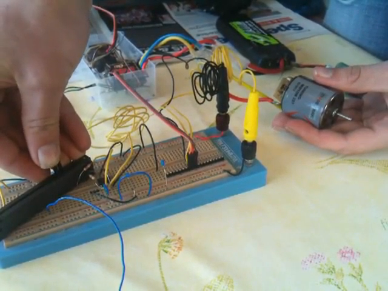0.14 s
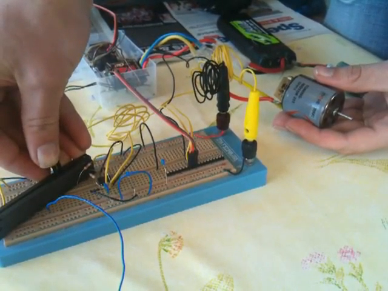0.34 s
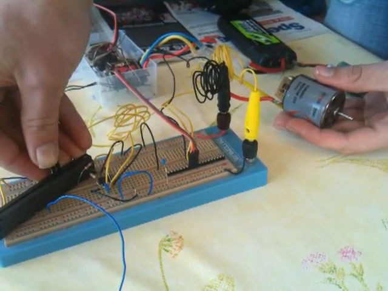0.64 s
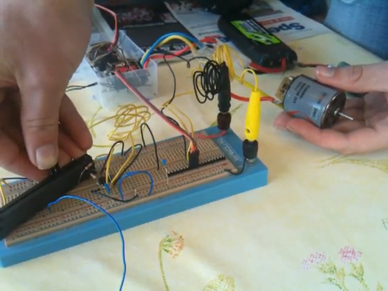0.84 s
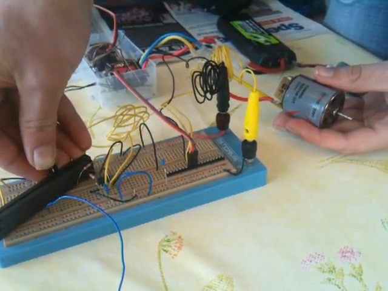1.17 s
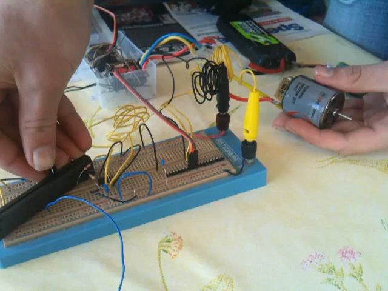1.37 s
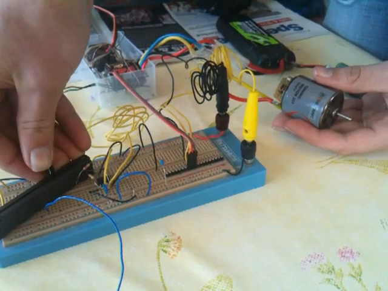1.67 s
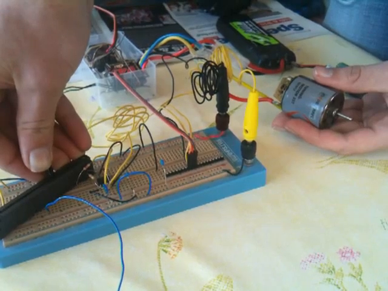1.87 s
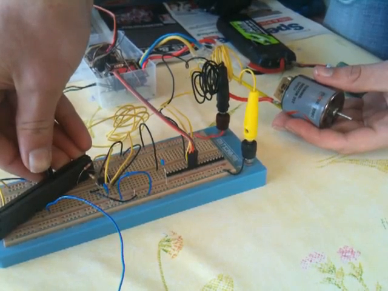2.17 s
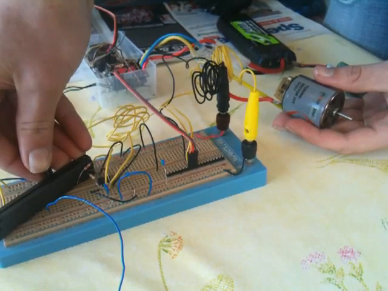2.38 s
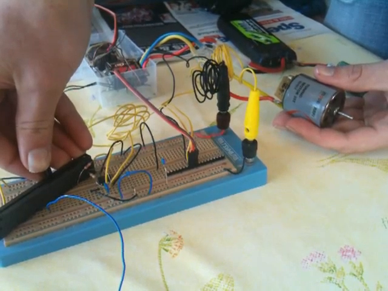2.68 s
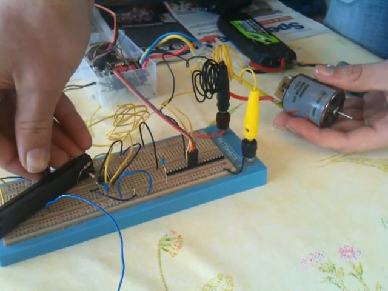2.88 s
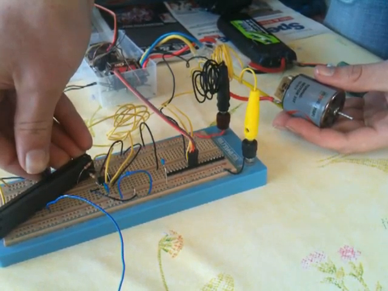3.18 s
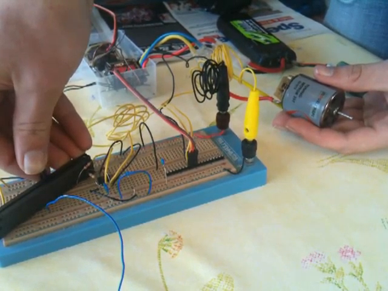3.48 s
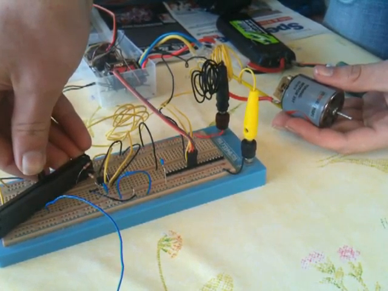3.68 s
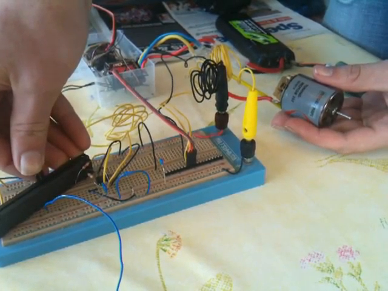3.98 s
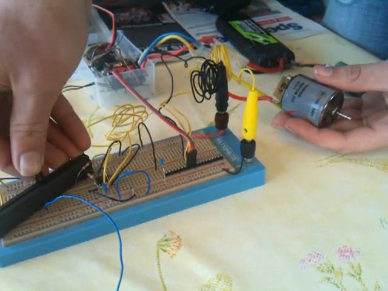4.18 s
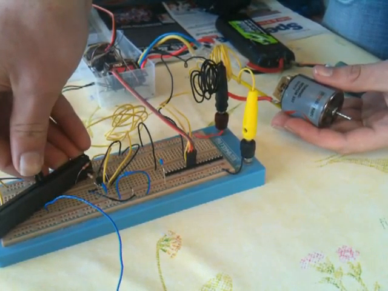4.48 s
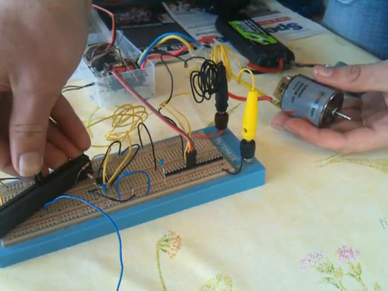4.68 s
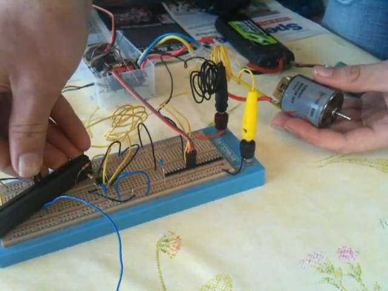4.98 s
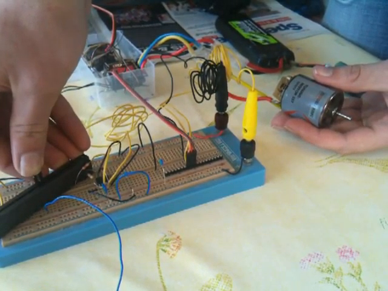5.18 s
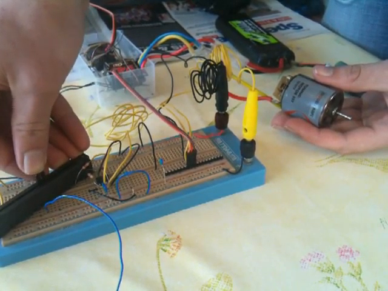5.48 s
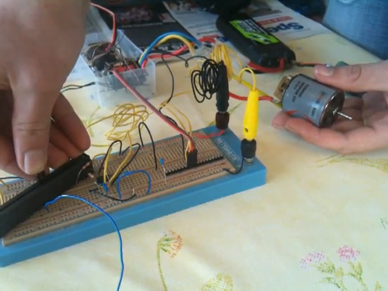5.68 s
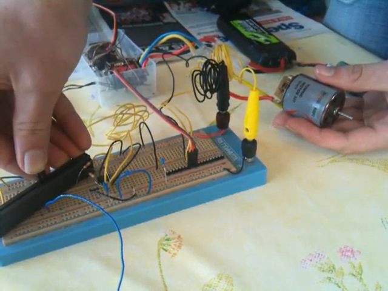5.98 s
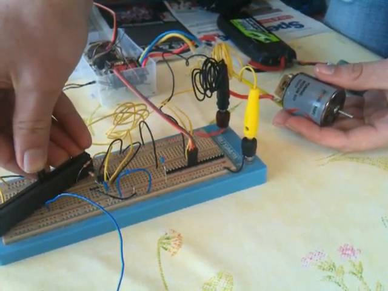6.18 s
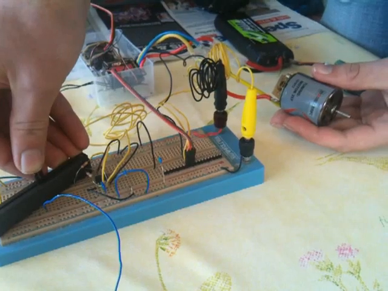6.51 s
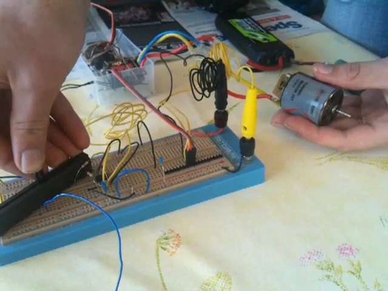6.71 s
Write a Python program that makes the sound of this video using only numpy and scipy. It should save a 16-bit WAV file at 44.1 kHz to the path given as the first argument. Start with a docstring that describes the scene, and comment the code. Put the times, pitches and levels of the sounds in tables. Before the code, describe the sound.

Close, dry indoor sound of a little electric motor: steady high whir and metallic brush hiss at first, slowly sagging in pitch. Dull knocks on the bench, a sudden drop in harshness, then a faster wind-down with a wavering electronic whine and small rasps until it stalls. Quiet room murmur follows, then a pulsing whine with irregular dry scratches as it turns slowly, plus one soft late bump.

```python
"""In a quiet room a small three-pole brushed motor, held in a hand over a table, runs from a chopped supply.
A knob turned by hand takes it from full speed down to a stall, then restarts it at a crawl.
Brush friction and arcing are noise pulsed by the passing segments and coloured by the steel can; rotor tones
follow the shaft speed; the windings sing at multiples of the chopping rate. Caught brushes scrape, segments tick,
and the hands bump the bench, whose modes ring."""
import sys
import numpy as np
from scipy import signal
from scipy.fft import rfft, irfft, next_fast_len
from scipy.io import wavfile

SR = 44100
rng = np.random.default_rng(int(sys.argv[2]) if len(sys.argv) > 2 else 0)


def persist_wave(psi):
    """Save psi, clipped to +-1, as 16-bit WAV."""
    counts = np.round(np.clip(psi, -1, 1) * 32767).astype(np.int16)
    wavfile.write(sys.argv[1], SR, np.atleast_2d(counts).T)


N = 302085
TIME, BINS = np.arange(N) / SR, np.arange(N // 2 + 1) * SR / N  # [s], [Hz]

# room background, relative spectrum: (frequency [Hz], level [dB])
ROOM_SPECTRUM = [(15, -77), (25, -52), (98, -17.5), (128, -8.5), (164, -10.5), (193, -3.5), (268, -5.5),
                 (451, -13), (489, -5), (531, -10.5), (757, -11), (2380, -20.5), (2800, -18.5),
                 (11300, -23), (17000, -29)]
# faint, slowly wavering room tones, middle levels: (frequency [Hz], level [dB])
ROOM_HUMS = [(274.5, -83), (489.9, -84), (7483, -95)]
# soft bumps on the bench: (time [s], strength [dB], pitch of the contact [Hz])
BENCH_BUMPS = [(1.598, -50.5, 140), (1.750, -49, 428), (1.760, -52, 330), (1.771, -43.5, 216),
               (1.782, -46, 258), (1.783, -55, 457), (1.790, -54.5, 614), (1.811, -58, 480),
               (1.829, -62, 250), (6.501, -50, 196)]
# modes of the bench: (frequency [Hz], relative level [dB], decay by 60 dB [s])
BENCH_MODES = [(151, -2, 0.05), (220, -11, 0.07), (261, -7, 0.18), (350, -4, 0.096), (424, 2, 0.13),
               (496, 5.5, 0.046), (635, 4, 0.052)]
# share of each chopping period for which the supply is on: (time [s], duty [0-1])
SUPPLY_DUTY = [(.5, 1), (1.6, 0.88), (3.2, 0.64), (3.45, 0.23), (4.16, 0.08), (4.19, 0.02), (4.72, .01),
               (4.74, 0), (5.47, 0), (5.55, 0.03), (5.6, 0.06), (5.65, 0.18), (5.8, 0.14)]
# shaft speed while the knob is turned down: (time [s], speed [turns/s])
SPEED_WIND_DOWN = [(0.0, 255.1), (0.37, 254.9), (0.44, 249.3), (0.53, 239.0), (0.62, 234.2), (0.82, 231.7),
                   (1.0, 225.9), (1.18, 220.8), (1.33, 220.5), (1.5, 217.2), (1.7, 209.8), (1.85, 203.0),
                   (1.94, 199.0), (2.0, 190.2), (2.1, 186.2), (2.27, 177.7), (2.58, 169.8), (2.78, 160.5),
                   (3.05, 143.2), (3.28, 125.2), (3.42, 110.4), (3.6, 96.4)]
# even braking to a stop: (time [s], speed [turns/s])
SPEED_BRAKING = [(3.6, 96.5), (4.21, 0)]
# uneven crawl after the restart: (time [s], speed [turns/s])
SPEED_CRAWL = [(5.64, 0), (5.72, 9.5), (5.9, 15.94), (6.08, 14.55), (6.23, 16.7), (6.44, 13.4),
               (6.58, 15.84), (6.85, 12.46)]
# song of the windings, before duty and shell:
# (multiple of chopping rate [-], steady level [dB], level of the part swinging with the poles [dB])
WINDING_OVERTONES = [(1, -63.5, -52.5), (2, -69, -58), (3, -63.5, -70), (4, -74.5, -68), (5, -60.5, -62.5),
                     (6, -100, -85), (8, -67, -83)]
# path of coil vibration to the air: (frequency [Hz], gain [dB])
COIL_PATH = [(300, -22), (660, -16), (800, -23), (1000, -17), (1230, -6), (1600, -12), (2100, -17),
             (2400, -12.5), (2700, -12), (3000, -14), (3750, -13), (4500, 3), (5200, -2.5), (5650, -15),
             (6750, 5.5), (8700, 1), (10500, -35)]
# a brush catches, at a crawl about once a turn: (time [s], relative peak level [dB])
BRUSH_CATCHES = [(3.1023, -45), (3.477, -37), (3.535, -42), (3.8203, -46), (3.889, -41.5), (4.033, -48),
                 (4.122, -42.5), (4.1607, -50), (5.753, -56), (5.882, -43.5), (5.9457, -46), (6.011, -44),
                 (6.1442, -42), (6.2065, -42), (6.2298, -43.5), (6.2684, -46), (6.3325, -43.5), (6.4, -46),
                 (6.474, -41), (6.544, -49), (6.607, -46), (6.673, -47), (6.7435, -43), (6.8193, -35)]
# colour of a brush's scrape, relative: (frequency [Hz], level [dB])
SCRAPE_COLOUR = [(100, -50), (500, -23), (2400, -19), (3300, -11), (4700, -16), (6100, -5.5), (6800, 3.5),
                 (7700, -10), (10000, -9), (12200, -15.5), (13100, 4.5), (14200, -24), (16500, -40)]
# tones of the rotor, before bearings: (multiple of shaft speed [-], level at full speed [dB],
# fall per halving of the speed [dB], lift under heavy current [dB])
ROTOR_ORDERS = [(2, -57.5, 49.5, 0.5), (3, -68.0, -10.5, 9.5), (5, -61.0, 22.0, -2.5), (6, -68.5, 4.0, 7.0),
                (8, -53.0, 28.0, -7.5), (9, -48.5, 15.5, 3.0), (12, -56.5, 10.0, -2.5),
                (15, -55.0, 23.5, -7.0), (18, -74.5, 7.0, 4.0), (21, -62.0, 19.0, -12.5),
                (24, -66.5, 10.5, -5.5), (27, -77.5, -2.5, 1.0), (30, -69.0, 10.5, -0.5),
                (33, -77.5, 9.5, 5.0), (36, -81.0, -4.0, 1.0), (39, -71.0, 18.5, -5.5),
                (42, -81.0, 0.0, 4.5), (45, -76.0, 10.5, -0.5), (48, -79.0, 4.0, -0.0),
                (51, -72.0, 13.0, -5.0), (54, -80.0, 4.5, 1.0), (57, -83.0, 4.0, -6.0),
                (60, -88.5, -2.5, -0.5), (63, -74.5, 12.5, -14.5)]
# path of rotor vibration through the bearings to the air: (frequency [Hz], gain [dB])
BEARING_PATH = [(250, -39), (500, -12.5), (700, -5.5), (900, -10), (1100, -21), (1700, -20), (2700, -17),
                (3400, -10), (4200, 3), (5600, 5.5), (6300, 1.5), (8500, 9.5), (10000, 12), (14500, 5),
                (15200, -20)]
# resonances of bearings and end plates: (frequency [Hz], width [Hz], lift [dB])
END_PLATE_RESONANCES = [(766, 27, 5), (1158, 168, 12.5), (1295, 159, 13), (2232, 535, 13), (2452, 218, 12),
                        (2985, 200, 7.5), (4206, 224, 3.5), (4630, 384, 12), (5120, 400, 10),
                        (6624, 580, 15), (7460, 850, 10), (8668, 398, 5)]
# broad response of the motor, relative: (frequency [Hz], gain [dB])
BODY_RESPONSE = [(40, -101), (150, -15.5), (700, -9.5), (1700, -12), (2900, -9.5), (3500, -9), (4300, 6),
                 (5800, 4.5), (7500, 4), (8300, 3.5), (11000, 2), (12300, -4.5), (13800, 1.5), (15200, -43)]
# resonances of the steel can: (frequency [Hz], width [Hz], lift [dB])
CAN_RESONANCES = [(1324, 47, 8.5), (2336, 525, 11), (4870, 114, 6.5), (6620, 355, 11), (7380, 780, 4),
                  (9820, 290, 5.5), (12890, 400, 10.5), (13560, 290, -5)]

ROOM_DB = -68.5
CHOP_HZ, CUTOFF_HZ = 1161.4, 17100
FULL_SPEED, BUZZ_FADE_SPEED = 255, 76  # [turns/s]; well below the second the rotor tones vanish
# segment edges passing a brush per turn, and the place of one of them [turns past rest]
SEGMENTS, SEGMENT_TURNS = 6, .39
# ticks of the sliding segments; above the fade speed [turns/s] they fade away
TICK_DB, TICK_HZ, TICK_WIDTH_HZ, TICK_FADE_SPEED = -62.5, 9500, 950, 28
# friction grows from a crawl up to the speed [turns/s] at which the brushes begin to skim
RUB_CRAWL_DB, RUB_SKIM_DB, SKIM_SPEED, RUB_CURVE = -62.5, -49.5, 163, 1.97
RUB_ONSET_SPEED, RUB_RELEASE_S = 4.9, 0.036  # full rubbing from this speed [turns/s]; decay constant after a stop
# the brushes drag for a moment: (time [s], half length [s], extra friction [dB])
DRAGS = [(3.072, 0.014, 4), (3.484, 0.069, 6), (3.866, 0.1, 3)]
# arcing at high speed builds up, then dies at once; a faint fizz stays while current flows
ARC_FIRST_DB, ARC_FULL_DB, FIZZ_DB = -43.5, -38.5, -61.5
ARC_GROWS_S, ARC_FULL_S, ARC_ENDS_S, ARC_RELEASE_S = 0.13, 1.38, 1.96, 0.025


def from_db(db):
    """Decibel law: 20 dB is a factor of ten in amplitude."""
    return 10 ** (np.asarray(db) / 20)


def rms_one(x):
    """Normalisation to unit mean power."""
    return x / np.sqrt(np.mean(x ** 2) + 1e-20)


def in_time(rows):
    """Linear interpolation: each column of a curve, sample by sample."""
    s, *columns = np.transpose(rows)
    return [np.interp(TIME, s, c) for c in columns]


def at_hz(points, hz):
    """Interpolation of a spectrum on a logarithmic frequency axis."""
    table = np.array(points)
    return np.interp(np.log(hz + 1), np.log(table[:, 0]), table[:, 1])


def resonant_db(broad, resonances, hz):
    """Resonance: peaks, or dips, of given width stand on a broad response."""
    peaks = sum(lift / (1 + (2 * (hz - centre) / width) ** 2) for centre, width, lift in resonances)
    return at_hz(broad, hz) + peaks


def colour(x, gain_db):
    """Linear filtering by one gain per frequency bin, then unit rms."""
    return rms_one(irfft(rfft(x) * from_db(gain_db), N))


def white():
    """White noise: equal mean power at all frequencies."""
    return rng.standard_normal(N)


def drift(rate):
    """Low-passed chance of spread 1, slower than about rate [Hz], drawn on a coarse grid and joined by lines."""
    step = 64 if rate < 100 else 4
    size = next_fast_len(N // step + 2)
    hz = np.arange(size // 2 + 1) * SR / step / size
    slow = irfft(rfft(rng.standard_normal(size)) / (1 + (hz / rate) ** 2), size)
    return np.interp(np.arange(N) / step, np.arange(size), rms_one(slow))


def tone(cycles):
    """Simple harmonic motion: a sine of rms 1 with a random starting phase."""
    return np.sqrt(2) * np.sin(2 * np.pi * (cycles + rng.random()))


def room():
    """Stationary background: broadband air murmur and hiss, plus faint, slowly wavering tones."""
    air = from_db(ROOM_DB) * colour(white(), at_hz(ROOM_SPECTRUM, BINS))
    return air + sum(from_db(db + 2 * drift(4.1)) * tone(hz * TIME) for hz, db in ROOM_HUMS)


def bumps(rustle_db=-11.0, rustle_s=0.075, rustle_rise_s=0.013, rustle_hz=620, spread=1.36, lowest_hz=125):
    """Modal excitation: each soft contact rings the modes near its pitch, with a dull rustle and no deep bass."""
    push, shake, out = np.zeros(N), np.zeros(N), np.zeros(N)
    for s, db, hz in BENCH_BUMPS:
        click = from_db(db) * (np.arange(N) == round(s * SR))
        contact = signal.butter(2, [hz / spread, hz * spread], "band", fs=SR, output="sos")
        push += signal.sosfilt(contact, click + 1e-18)  # the offset is inaudible
        age = np.maximum(TIME - s, 0)
        envelope = (1 - np.exp(-age / rustle_rise_s)) * np.exp(-age / rustle_s)
        shake += from_db(db) * min(hz / rustle_hz, 1) ** 2 * envelope
    for hz, db, t60 in BENCH_MODES:
        radius, step = from_db(-60 / (t60 * SR)), 2 * np.pi * hz / SR
        resonator = [1, -2 * radius * np.cos(step), radius * radius]
        out += from_db(db) * signal.lfilter([0, np.sin(step)], resonator, push)
    rustle = signal.sosfilt(signal.butter(4, rustle_hz, fs=SR, output="sos"), white())
    out += from_db(rustle_db) * shake * rms_one(rustle)
    return signal.sosfilt(signal.butter(6, lowest_hz, "high", fs=SR, output="sos"), out)


def shaft_speed():
    """Rotational kinematics [turns/s]: wound down, braked to a stop, then crawling."""
    return np.maximum(in_time([*SPEED_WIND_DOWN, *SPEED_BRAKING, *SPEED_CRAWL])[0], 0)


def speed_gain(speed, full_db, fall_db):
    """Power law: the level changes by the same number of dB with each halving of the speed."""
    return from_db(full_db + fall_db * np.log2(speed / FULL_SPEED + 1e-9))


def arcing():
    """Exponential release: 1 while the brushes arc under heavy current, then quickly towards 0."""
    return np.exp(-np.maximum(TIME - ARC_ENDS_S, 0) / ARC_RELEASE_S)


def catches(swell_s=0.0015, delay_s=0.0027, catch_db=-6.5):
    """Transient friction: a brush catches on a rough spot and scrapes for a few milliseconds."""
    scrape = colour(white(), at_hz(SCRAPE_COLOUR, BINS))
    press = sum(from_db(db) / (1 + ((TIME - s - delay_s) / swell_s) ** 2) for s, db in BRUSH_CATCHES)
    return from_db(catch_db) * press * scrape


def segment_ticks(turns, speed, sharpness=9.3, uneven_db=4.0):
    """Periodic impact: six times a turn a segment's edge gives a thin, high tick."""
    passing = np.exp(sharpness * (np.cos(2 * np.pi * SEGMENTS * (turns - SEGMENT_TURNS)) - 1))
    fizz = colour(white(), -20 * np.log10(1 + (2 * (BINS - TICK_HZ) / TICK_WIDTH_HZ) ** 2))
    slow = np.clip(speed / 10, 0, 1) / (1 + (speed / TICK_FADE_SPEED) ** 4)
    return from_db(TICK_DB + uneven_db * drift(60)) * slow * passing * fizz


def windings(turns, speed, duty, second=0.44, third=0.24, skew=0.28, lag=0.22,
             smoothing_speed=90, patchy_db=4.5, patchy_speed=50):
    """Modulation of a chopped current: passing poles swing each coil overtone and split it into side tones."""
    pole = 2 * np.pi * 3 * turns  # three poles per turn
    sliding = np.clip(speed / 10, 0, 1)
    smoothed = 1 / np.hypot(1, speed / smoothing_speed)  # the coils even out fast swings
    out = np.zeros(N)
    for k, steady_db, swing_db in WINDING_OVERTONES:
        angle = pole + lag * (k - 4)
        swing = np.cos(angle) + 1j * skew * (-1) ** k * np.sin(angle)
        swing += second * (k % 4 == 0) * np.exp(2j * angle)
        swing += third / k * np.exp(3j * angle)
        # sliding contacts make the current unsteady
        swing += .3 * sliding * (drift(70) + 1j * drift(70))
        swing *= smoothed * from_db(patchy_db * np.minimum(speed / patchy_speed, 1) * drift(17))
        pulse_strength = np.sin(np.pi * k * duty)  # Fourier series of a pulse train
        carrier = np.exp(2j * np.pi * (k * CHOP_HZ * TIME + rng.random()))
        overtone = np.sqrt(2) * pulse_strength * carrier
        out += np.real(overtone * (from_db(steady_db) + from_db(swing_db) * swing))
    return out


def through_shell(vibration):
    """Transmission: the shell filters the coils' vibration on its way to the air."""
    size = next_fast_len(N + SR)  # padded against wrap-around
    hz = np.arange(size // 2 + 1) * SR / size
    return irfft(rfft(vibration, size) * from_db(at_hz(COIL_PATH, hz)), size)[:N]


def rotor_hum(turns, speed, waver_db=1.0, glide_flicker_db=1.8, flicker_hz=5000):
    """Order spectrum: what repeats every turn sounds as a comb; tones swell gliding through resonances."""
    angle = turns + .0005 * drift(20)
    path_db, load = resonant_db(BEARING_PATH, END_PLATE_RESONANCES, BINS), arcing()
    comb = 0
    for k, full_db, fall_db, load_db in ROTOR_ORDERS:
        # the higher the tone, the more it flickers
        flicker_db = glide_flicker_db * np.minimum(k * speed / flicker_hz, 1) * drift(11.5)
        resonance_db = np.interp(k * speed, BINS, path_db)
        db = resonance_db + load_db * load + waver_db * drift(33) + flicker_db
        comb = comb + speed_gain(speed, full_db + db, fall_db) * tone(k * angle)
    # at low speed the edges pass too gently to sing
    singing = 1 - 1 / (1 + (speed / BUZZ_FADE_SPEED) ** 6)
    return singing * comb


def friction(speed):
    """Sliding friction: rubbing grows with speed, swells where the brushes drag and dies away at a stop."""
    skim = np.minimum(speed / SKIM_SPEED, 1) ** RUB_CURVE
    drag_db = sum(db * np.exp(-((TIME - s) / half_s) ** 2) for s, half_s, db in DRAGS)
    keep = np.exp(-1 / (RUB_RELEASE_S * SR))
    turning = np.clip(speed / RUB_ONSET_SPEED, 0, 1)
    moving = np.maximum(turning, signal.lfilter([1 - keep], [1, -keep], turning))
    return moving * from_db(RUB_CRAWL_DB + (RUB_SKIM_DB - RUB_CRAWL_DB) * skim + drag_db)


def sparking(duty):
    """Addition of powers: arcs that grow and hold, and a fizz that follows the supplied power."""
    arc_db = np.interp(TIME, [ARC_GROWS_S, ARC_FULL_S], [ARC_FIRST_DB, ARC_FULL_DB])
    return np.hypot(from_db(arc_db) * arcing(), from_db(FIZZ_DB) * duty ** 0.5)


def brush_hiss(turns, speed, duty, gate_depth=0.33, gate_lag=0.43, grain_db=1.0, flutter_db=0.3,
               unsteady_db=1.28, spark_grain_db=1.0, spark_tilt_db=6.0, rub_tilt_db=5.5, rub_top_db=-6.5):
    """Amplitude-modulated noise: friction and sparks pulse six times a turn and excite the can."""
    shell_db = resonant_db(BODY_RESPONSE, CAN_RESONANCES, BINS)
    treble, top = np.clip((BINS - 8000) / 4500, 0, 2), np.clip((BINS - 11000) / 1500, 0, 1)
    segments = np.cos(2 * np.pi * SEGMENTS * (turns - SEGMENT_TURNS) - gate_lag)
    gate = (1 + gate_depth * segments * (speed > 0)) * from_db(flutter_db * drift(40))
    rub_noise = white() * gate * from_db(grain_db * drift(570))
    rub = colour(rub_noise, shell_db + rub_tilt_db * treble + rub_top_db * top)
    spark_noise = white() * gate * from_db(spark_grain_db * drift(1500))
    sparks = colour(spark_noise, shell_db + spark_tilt_db * treble)
    return friction(speed) * from_db(unsteady_db * drift(42)) * rub + sparking(duty) * sparks


def scene():
    """Superposition: one shaft angle, counted from its place of rest, drives the motor's turning sounds."""
    speed, duty = shaft_speed(), np.clip(in_time(SUPPLY_DUTY)[0], 0, 1)
    turns = np.cumsum(speed) / SR
    turns = turns - turns[np.argmin(speed)]
    background = room() + bumps()
    coils = through_shell(windings(turns, speed, duty))
    brushes = catches() + segment_ticks(turns, speed) + brush_hiss(turns, speed, duty)
    return (background + coils + rotor_hum(turns, speed) + brushes)[None]


def record(dry):
    """Band limitation: a steep cut of the top, after a fade-in of a few milliseconds."""
    fade = np.minimum(TIME / .004, 1)
    return signal.sosfilt(signal.ellip(10, .1, 70, CUTOFF_HZ, fs=SR, output="sos"), fade * dry)


dry = scene()
out = record(dry)
persist_wave(out)
```